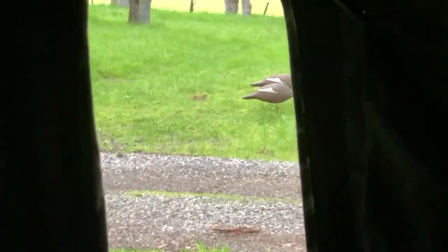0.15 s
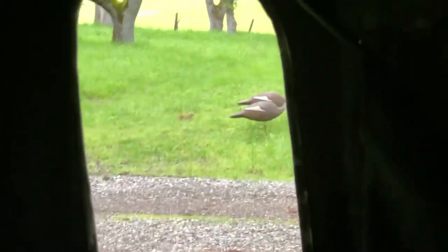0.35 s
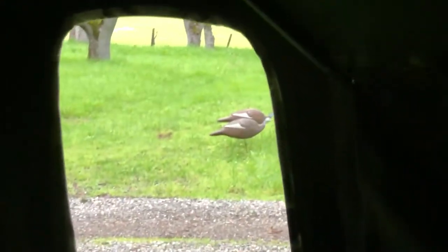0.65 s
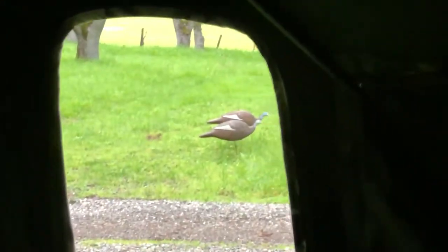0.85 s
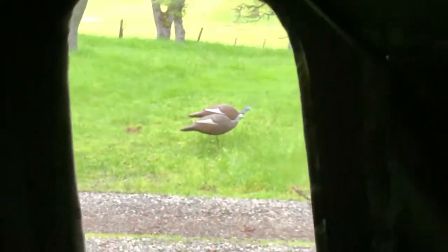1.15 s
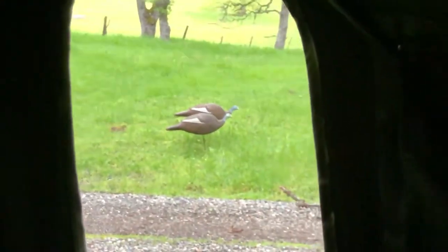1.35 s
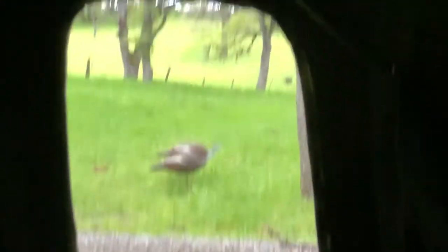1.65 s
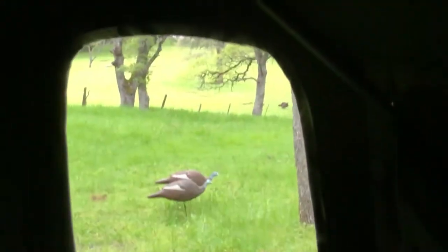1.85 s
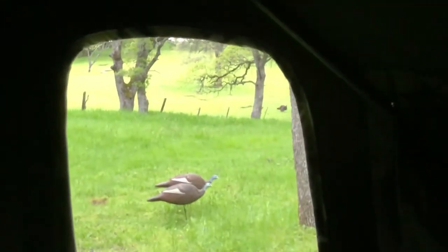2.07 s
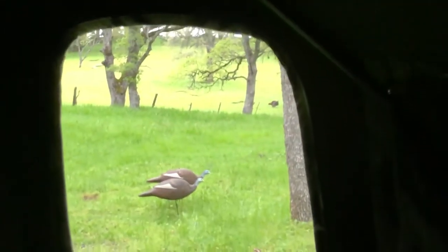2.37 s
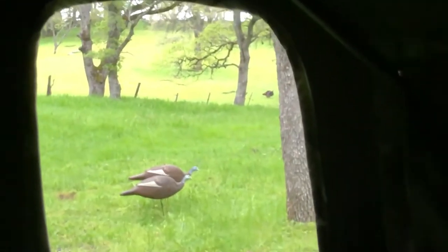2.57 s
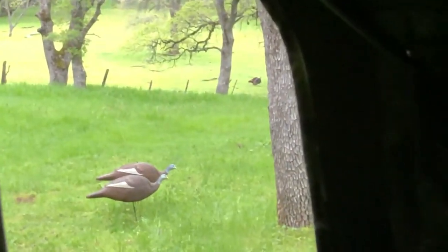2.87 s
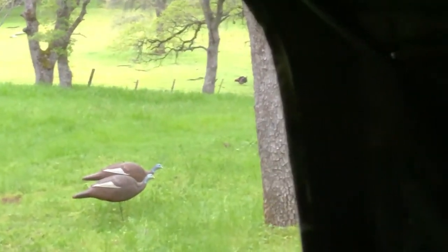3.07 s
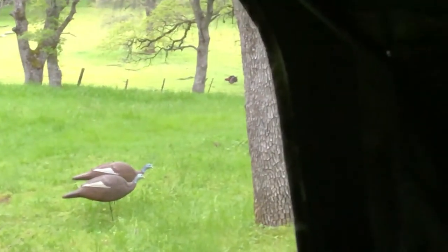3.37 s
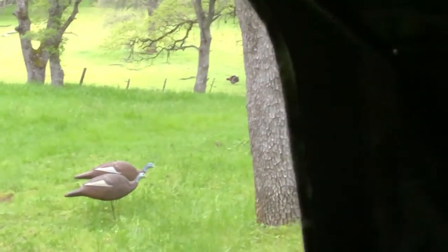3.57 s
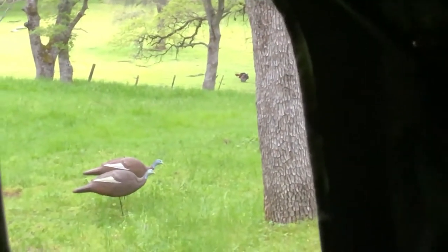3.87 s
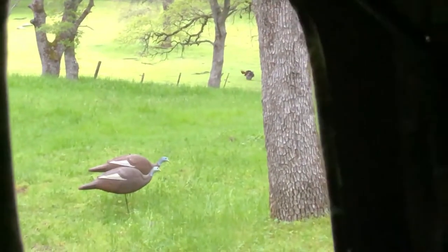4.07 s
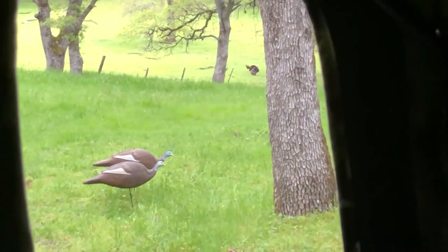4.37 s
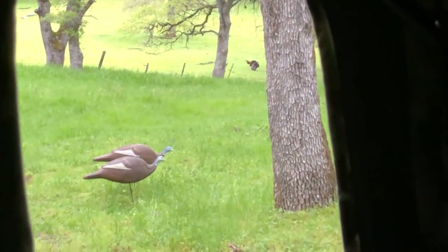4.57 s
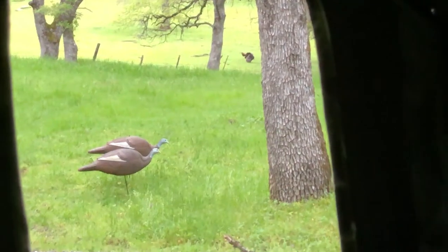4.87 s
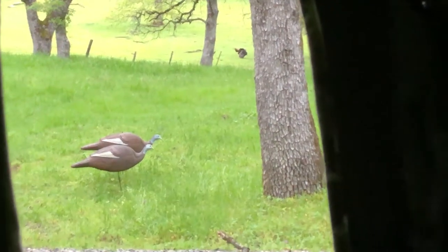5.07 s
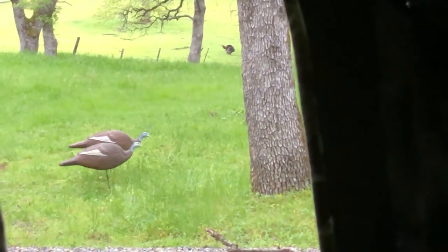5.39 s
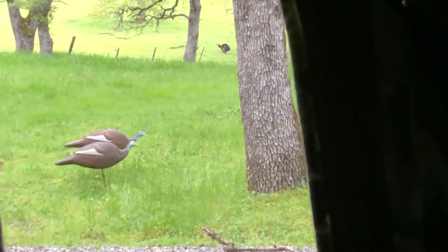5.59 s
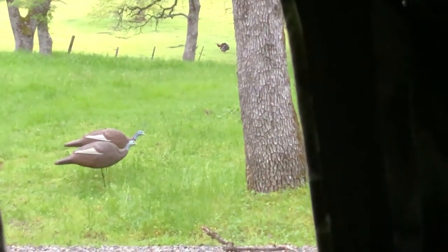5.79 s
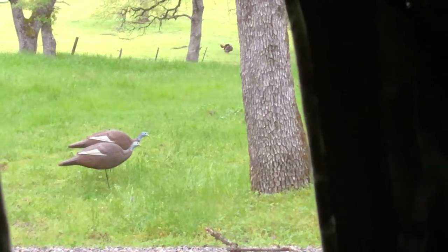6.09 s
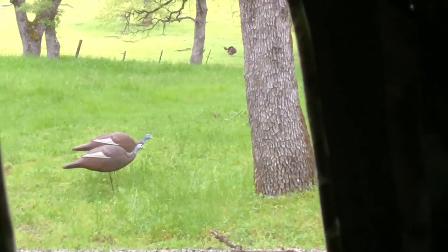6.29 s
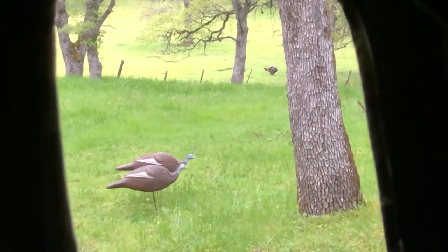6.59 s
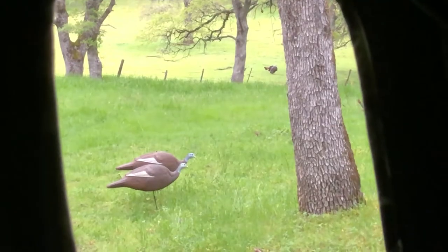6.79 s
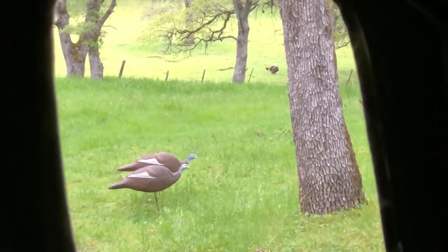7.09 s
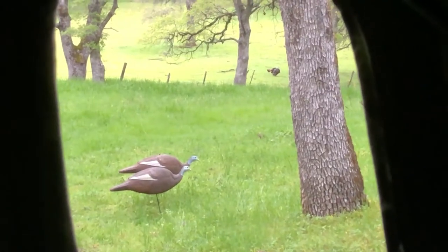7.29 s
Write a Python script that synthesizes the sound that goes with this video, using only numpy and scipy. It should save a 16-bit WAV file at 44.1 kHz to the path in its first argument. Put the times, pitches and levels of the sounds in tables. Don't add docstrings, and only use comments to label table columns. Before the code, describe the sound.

A bright songbird trill starts over deep unsteady rumble and gentle outdoor hiss. A hide taps, and a turkey lets out one abrupt, ringing cluck near the single microphone. Several short, dry putts follow, then scattered ones, two of them stronger around the middle. Small birds add buzzy falling notes, sliding whistles and fluttering warbles, near and far, across an open grassy meadow with light tree echo.

```python
import sys
import numpy as np
from scipy import signal
from scipy.fft import rfft, irfft
from scipy.io import wavfile
from scipy.ndimage import uniform_filter1d

SR = 44100
rng = np.random.default_rng(int(sys.argv[2]) if len(sys.argv) > 2 else 0)


def nominal_scale(level):
    x = np.asarray(level, float) / 20
    return 10 ** x


def wrap_up_sound(samples):
    columns = np.atleast_2d(samples).T
    tamed = np.clip(columns, -1, 1)
    steps = np.round(tamed * 32767).astype(np.int16)
    wavfile.write(sys.argv[1], SR, steps)


N = 328104
HZ = np.fft.rfftfreq(N, 1 / SR)
TIME_S = np.arange(N) / SR

# [f/Hz, width/Hz, level/dB]
RUMBLE_DRONES = [(47.6, 22.6, -10), (74.4, 19.8, -4), (90.4, 9.9, 0), (127.5, 28.8, -8)]
# [t/s, level/dB]
RUMBLE_SURGES = [(.06, -5), (.14, 1), (.24, 3.5), (.54, -4), (.82, 6), (1.12, 1.5), (1.2, -6), (1.43, 5),
                 (1.57, -4.5), (1.73, 3), (1.88, 2), (2.05, 8.5), (2.14, -5.5), (2.34, 5.5), (2.42, -3.5),
                 (2.48, 4), (2.77, 5), (3.9, 6.5), (4.27, 2.5), (4.64, -9), (4.72, 7.5), (4.9, 3.5),
                 (4.95, -3.5), (5.01, 1.5), (5.62, 6), (5.8, 3.5), (6.06, -3), (6.65, 3.5), (6.79, -6),
                 (7.07, 5)]
RUMBLE_DB, SURGE_S = -33, 0.031
# [f/Hz, density/dB per Hz]
AIR_SPECTRUM = [(82, -48), (140, -2), (400, -7.5), (801, -14.5), (3400, -26.5), (3920, -27), (8830, -30.5),
                (16000, -34.5)]
# [t/s, level/dB]
BREEZE_SWELL = [(0, 0), (.6, -.5), (1.35, 1.5), (1.72, 0.5), (2.0, -0.5), (2.3, -0.5), (3.4, -0.5),
                (4.0, 0), (4.4, -0.5), (5.08, -1), (5.45, -0.5), (5.93, -1), (6.4, -0.5), (6.8, -1),
                (7.1, -1.5), (7.44, 0)]
AIR_DB, BREEZE_TREBLE_SHARE = -41, 0.3

# [t/s, length/s, f/Hz, peak/dB]
PEEP_NOTES = [(0, 0.01, 4880, -35), (.485, 0.043, 3470, -54), (1.017, 0.016, 3930, -40.5),
              (1.16, 0.024, 4050, -51), (1.362, 0.029, 3890, -49), (1.525, 0.027, 3900, -50),
              (1.635, .025, 6110, -53), (1.86, .06, 4700, -58), (2.37, .14, 3640, -62),
              (2.976, .06, 4950, -59), (3.063, 0.11, 3730, -59), (3.31, 0.026, 4900, -54),
              (3.723, 0.027, 4920, -53), (3.843, .04, 4400, -61), (4.18, 0.022, 4950, -55),
              (4.67, .03, 3950, -51), (5.155, .08, 5900, -58), (5.294, 0.12, 3080, -55.5),
              (5.329, 0.025, 4500, -50), (5.577, .02, 4910, -52), (5.753, 0.023, 5350, -53),
              (5.89, .04, 6600, -57), (6.04, .025, 3970, -58), (6.072, 0.027, 3080, -55),
              (6.1, .08, 4900, -63), (6.19, .03, 4650, -58), (6.29, 0.049, 3760, -58),
              (7.254, 0.12, 3290, -59.5)]
# [t/s, level/dB, bottom f/Hz, end f/Hz, end level/dB re note]
TRILL_NOTES = [
    (.005, -36, 4300, 4980, 3.5),
    (0.075, -37.5, 4080, 4920, 3),
    (.147, -36, 4085, 4580, 0.5),
    (0.219, -34.5, 4100, 4780, -5),
    (0.292, -37.5, 3820, 4430, 3.5),
    (.368, -38, 4040, 4840, 1),
]
TRILL_TOP_HZ, DIVE_S, HOOK_S = 5900, 0.017, 0.0213
# [t/s, level/dB]
CHORUS_LEVEL = [(0.0, -55), (0.18, -54), (0.7, -53.5), (1.24, -53.5), (1.8, -56.5), (2.03, -62),
                (2.84, -60.5), (2.98, -54), (3.13, -62.5), (3.77, -55), (4.81, -57.5), (4.95, -61.5),
                (5.88, -54), (6.15, -53), (6.38, -64), (6.84, -67), (7.44, -64)]
# [t/s, peak/dB]
SEEP_NOTES = [(.42, -63), (.63, -63), (.84, -64), (1.57, -60), (2.43, -67), (2.57, -63), (3.4, -63),
              (3.63, -66), (4.14, -64), (4.43, -64), (4.82, -64), (5.59, -64), (6.43, -66), (6.58, -65),
              (6.89, -64)]
SEEP_HZ, SEEP_S = 8850, 0.06
# [t/s, length/s, start f/Hz, end f/Hz, peak/dB]
DIVE_NOTES = [(0.588, 0.059, 6240, 4600, -50), (.64, .04, 6160, 5800, -52), (0.697, .075, 6380, 4180, -49),
              (.825, .065, 6300, 4300, -45), (0.932, 0.088, 7600, 4500, -39.5),
              (1.083, .09, 7690, 3870, -45.5), (1.155, 0.024, 3900, 2900, -45.5),
              (1.293, .08, 6150, 3830, -49), (1.44, .095, 7400, 4050, -44.5),
              (1.516, .028, 4200, 3010, -46), (4.074, 0.021, 3540, 3030, -46),
              (4.795, 0.18, 3680, 3300, -49.5), (5.113, 0.032, 5970, 5360, -42),
              (5.867, 0.037, 6600, 5500, -45)]
# [t/s, length/s, start f/Hz, end f/Hz, peak/dB]
SLUR_NOTES = [(1.706, 0.11, 3230, 5020, -44), (1.777, .07, 5080, 4280, -46), (2.79, .018, 4250, 5050, -46),
              (2.804, 0.071, 5130, 4550, -48), (2.926, 0.03, 4800, 4900, -46),
              (2.973, .09, 4490, 3660, -45.5), (3.353, 0.073, 3840, 4550, -44),
              (3.588, 0.068, 4030, 4400, -41), (3.76, 0.076, 3960, 4404, -39.5),
              (4.645, 0.014, 3860, 5350, -44), (5.049, .085, 6430, 5900, -40.5),
              (5.73, 0.053, 3780, 4130, -45.5), (3.416, .015, 4800, 6600, -50),
              (3.99, 0.022, 2130, 2460, -45)]
SLUR_EASE = 1.2
# [t/s, length/s, centre f/Hz, peak/dB]
WARBLE_NOTES = [
    (4.003, 0.045, 4060, -44.5),
    (4.166, 0.053, 4080, -41),
    (4.334, 0.051, 3990, -44),
    (4.494, 0.075, 3730, -49.5),
    (4.616, 0.056, 3850, -48),
]
WARBLE_SWING_HZ, WARBLE_TURN_S = 230, 0.031
# (peak at share of length, start/dB re peak, end/dB re peak)
DIVE_SWELL, SLUR_SWELL = (0.57, -13.5, -9.5), (1, -12, -19)
WARBLE_SWELL, PEEP_SWELL = (0.59, -6, -12), (0.29, 2.5, -4.5)
DIVE_BUZZ, SLUR_BUZZ, WARBLE_BUZZ, PEEP_BUZZ = 0.75, 0.2, 0.3, 0.3
TREES_T60_S, TREES_GAP_S = 0.25, 0.00302

# [t/s,
# peak/dB, f/Hz, width/Hz]
TICK_EVENTS = [(0.228, -23, 300, 400), (0.551, -35, 2500, 600), (.556, -35, 3300, 1400),
               (.561, -34, 2500, 600), (.566, -38, 2400, 500), (.572, -39, 2600, 600),
               (1.1052, -28, 2300, 900), (1.106, -19, 5300, 2980), (1.3008, -36, 960, 400),
               (1.985, -31, 9000, 9000), (2.155, -34, 5000, 4000), (2.257, -28, 400, 500),
               (2.2572, -31, 3500, 3000), (2.26, -27, 140, 90), (2.331, -35, 1500, 1800),
               (2.333, -26, 140, 100), (5.079, -36, 380, 200), (5.097, -27.5, 570, 300),
               (5.098, -35, 1090, 400), (6.384, -36, 1300, 1000)]

# [t/s, level/dB]
VOICE_POPS = [
    (0.5468, -18.5),
    (0.55, -27),
    (0.5533, -23),
    (.5582, -13),
    (0.567, -27),
    (0.572, -31),
    (.581, -36),
    (0.59, -35),
]
# [f/Hz, level/dB, t60/s]
THROAT_RINGS = [(1270, -32, .09), (1360, 2, 0.062), (1405, -1, 0.08), (1480, 1.5, 0.076), (1665, -8, .09),
                (1800, -12, 0.12), (1870, -1.5, 0.081)]
CLUCK_SHUT_S = 0.598
# [f/Hz, width/Hz, level/dB]
LEAF_PEAKS = [(1830, 220, 2), (1500, 200, -8)]

# [t/s, level/dB (throat rms 10 dB lower), length/s, chest level/dB, brightness/dB]
PUTT_EVENTS = [(1.299, -28.5, 0.018, 4, -6), (1.38, -29.5, 0.027, -1, -4), (1.453, -32, 0.019, 6, -1),
               (1.54, -32.5, 0.018, 7, -2), (1.659, -33.5, 0.02, 3, -7), (2.472, -38, 0.012, -3, 2),
               (2.879, -24, 0.027, -4, -4.5), (3.89, -25.5, 0.022, 0, -4.5), (4.134, -32, 0.026, 2, -4),
               (4.718, -27.5, 0.02, 0, -5.5), (7.332, -40, 0.02, 7, 5)]
# [f/Hz, width/Hz, level/dB]
THROAT_PEAKS = [(1064, 81, 1.5), (1640, 400, -10.5), (2280, 170, -7), (2620, 800, -12.5),
                (3440, 750, -13.5), (5240, 2200, -22)]
# [f/Hz, width/Hz, level/dB]
CHEST_PEAKS = [(477, 48, -1.5), (700, 37, -4)]

TOP_HZ = 15780


def level(x, db):
    return x * nominal_scale(db) / np.sqrt(np.mean(x ** 2))


def resonate(x, peaks):
    f = np.fft.rfftfreq(len(x), 1 / SR) + 1e-3
    response = 0
    for k, (hz, width_hz, db) in enumerate(peaks):
        detune = f / width_hz - hz * hz / (f * width_hz)
        response = response + (-1) ** k * nominal_scale(db) / (1 + 1j * detune)
    return irfft(rfft(x) * response, len(x))


def add(out, s, x):
    i = int(s * SR)
    out[i:i + len(x)] += x[:N - i]


def rumble():
    drone = resonate(rng.standard_normal(N), RUMBLE_DRONES)
    drone = resonate(drone, [(82.4, 95, 0)])
    drone /= np.sqrt(uniform_filter1d(drone ** 2, int(0.09 * SR)))
    surge_db = sum(db * np.exp(-((TIME_S - s) / SURGE_S) ** 2) for s, db in RUMBLE_SURGES)
    return drone * nominal_scale(RUMBLE_DB + surge_db)


def walk(rate_hz):
    k = int(SR / rate_hz)
    steps = np.repeat(rng.standard_normal(N // k + 1), k)
    return 1.3 * uniform_filter1d(uniform_filter1d(steps, k), k)[:N]


def air():
    hz, db = np.transpose(AIR_SPECTRUM)
    spectrum = rfft(rng.standard_normal(N)) * nominal_scale(np.interp(np.log(HZ + 1), np.log(hz), db))
    swell_db = np.interp(TIME_S, *np.transpose(BREEZE_SWELL))
    hiss = 0
    for centre_hz in 125 * 2.0 ** np.arange(8):
        octaves = np.clip(np.log2((HZ + 1) / centre_hz), -1, 1)
        band = irfft(spectrum * np.cos(np.pi / 2 * octaves) ** 2, N)
        share = min(350 / centre_hz, 1)
        breeze_db = (share + (2.5 - share) * BREEZE_TREBLE_SHARE) * swell_db
        flicker_db = (1.07 + 0.56 * share) * walk(11)
        hiss = hiss + band * nominal_scale(breeze_db + flicker_db)
    whine = resonate(rng.standard_normal(N), [(15450, 250, 0)]) * nominal_scale(3 * walk(2.44))
    return level(hiss, AIR_DB) + level(whine, -70)


def trees(x, wet_db, t60_s):
    t = np.arange(SR) / SR
    tail = rng.standard_normal(SR) * 1000.0 ** (-t / t60_s) * (t > TREES_GAP_S)
    tail /= np.sqrt(np.sum(tail ** 2))
    return x + nominal_scale(wet_db) * signal.fftconvolve(x, tail)[:N]


def whistle(out, rows, buzz=1.0, buzz_hz=333.3, edge_s=0.003):
    s, hz, db = np.transpose(rows)
    t = np.arange(s[0], s[-1], 1 / SR)
    fade = np.clip(np.minimum(t - s[0], s[-1] - t) / edge_s, 0, 1)
    a, b = rng.standard_normal((2, 600))
    place = (t - s[0]) * 2 * buzz_hz * (0.5 + buzz)
    index = np.arange(600)
    smear = np.interp(place, index, a) + 1j * np.interp(place, index, b)
    carrier = np.exp(2j * np.pi * np.cumsum(np.interp(t, s, hz)) / SR)
    tone = carrier * (np.sqrt(1 - buzz) + np.sqrt(0.89 * buzz) * smear)
    add(out, s[0], np.sqrt(2) * nominal_scale(np.interp(t, s, db)) * fade * tone.real)


def note(out, s, length_s, pitch_hz, db, swell, buzz):
    share = np.linspace(0, 1, num=33)
    hz = np.interp(share, np.linspace(0, 1, num=len(pitch_hz)), pitch_hz)
    peak_at, start_db, end_db = swell
    shape_db = np.interp(share, [0, np.clip(peak_at, 0.05, 0.95), 1], [start_db, 0, end_db])
    whistle(out, np.transpose([s + length_s * share, hz, db + shape_db]), buzz)


def peeps(out):
    for s, length_s, hz, db in PEEP_NOTES:
        note(out, s, length_s, [hz, hz], db, PEEP_SWELL, PEEP_BUZZ)
    for s, db in SEEP_NOTES:
        note(out, s, SEEP_S, [SEEP_HZ, SEEP_HZ], db, PEEP_SWELL, PEEP_BUZZ)


def trill(out):
    for s, db, low_hz, end_hz, end_db in TRILL_NOTES:
        turn = s + DIVE_S
        rows = [(s, TRILL_TOP_HZ, db - 15),
                (s + 0.5 * DIVE_S, 1.17 * low_hz, db),
                (s + 0.776 * DIVE_S, 1.03 * low_hz, db + 0.5),
                (turn, low_hz, db),
                (turn + 0.294 * HOOK_S, 1.04 * low_hz, db),
                (turn + 0.7 * HOOK_S, end_hz, db + end_db),
                (turn + HOOK_S, 0.98 * end_hz, db + end_db - 3)]
        whistle(out, rows, buzz=0.2)


def chorus():
    far = np.zeros(N)
    for when, pitch, glide in rng.random((900, 3)):
        s, hz = 7.3 * when, 3500 + 2300 * pitch
        whistle(far, [(s, hz, 0), (s + 0.04, hz * (0.8 + 0.4 * glide), 0)])
    s, db = np.transpose(CHORUS_LEVEL)
    return level(trees(far, 10.5, 0.44), 0) * nominal_scale(np.interp(TIME_S, s, db))


def dives(out):
    for s, length_s, start_hz, end_hz, db in DIVE_NOTES:
        note(out, s, length_s, [start_hz, end_hz], db, DIVE_SWELL, DIVE_BUZZ)


def slurs(out):
    glide = (1 - np.linspace(0, 1, num=33)) ** SLUR_EASE
    for s, length_s, start_hz, end_hz, db in SLUR_NOTES:
        note(out, s, length_s, end_hz + (start_hz - end_hz) * glide, db, SLUR_SWELL, SLUR_BUZZ)


def warbles(out):
    for s, length_s, hz, db in WARBLE_NOTES:
        turns = np.linspace(-0.25, length_s / WARBLE_TURN_S - 0.25, num=33)
        swing_hz = WARBLE_SWING_HZ * np.cos(2 * np.pi * turns)
        note(out, s, length_s, hz + swing_hz, db, WARBLE_SWELL, WARBLE_BUZZ)


def birds():
    near = np.zeros(N)
    for sing in (peeps, trill, dives, slurs, warbles):
        sing(near)
    return trees(near, -5, TREES_T60_S) + chorus()


def ticks():
    out = np.zeros(N)
    impulse = np.arange(2048) == 0
    for s, db, hz, width_hz in TICK_EVENTS:
        peak = [(hz, width_hz, 0)]
        click = resonate(resonate(impulse, peak), peak)
        add(out, s, click * nominal_scale(db) / np.abs(click).max())
    return out


def cluck():
    pops = np.zeros(N)
    for s, db in VOICE_POPS:
        add(pops, s, nominal_scale(db) * np.ones(1))
    t = np.arange(SR // 4) / SR
    rings = 0
    for hz, db, t60_s in THROAT_RINGS:
        decay = 1000.0 ** (-t / (0.71 * t60_s))
        rings = rings + nominal_scale(db) * np.sin(2 * np.pi * hz * t) * decay
    onset = 1 - np.exp(-t / 0.0019)
    voice = signal.fftconvolve(pops, rings * onset)[:N]
    voice *= np.clip((CLUCK_SHUT_S - TIME_S) / 0.0044, 0, 1)
    beak = [(1490, 830, 0)]
    voice = resonate(resonate(voice, beak), beak)
    echo = trees(voice, -10.5, 0.67) - voice
    return voice + resonate(echo, LEAF_PEAKS)


def putts():
    out, t = np.zeros(N), np.arange(4096) / SR
    for s, db, length_s, chest_db, bright_db in PUTT_EVENTS:
        chance = rng.random((2, len(t)))
        clicks = (chance[0] < 4000 / SR) * (2 * chance[1] - 1)
        clicks[0] = 2.0
        spray = clicks * np.clip((length_s - t) / (0.54 * length_s), 0, 1)
        throat = resonate(spray, THROAT_PEAKS[:2])
        throat = throat + nominal_scale(bright_db) * resonate(spray, THROAT_PEAKS[2:])
        chest = nominal_scale(chest_db) * resonate(spray, CHEST_PEAKS)
        throat_rms = np.sqrt(np.sum(throat ** 2) / (length_s * SR))
        add(out, s, (throat + chest) * nominal_scale(db - 10) / throat_rms)
    return trees(out, -8, 0.073)


def scene():
    return (rumble() + air() + birds() + ticks() + cluck() + putts())[None]


def roll_off(x):
    return signal.sosfilt(signal.butter(12, 17060, fs=SR, output="sos"), x)


def record(dry):
    mix = irfft(rfft(dry) * (HZ < TOP_HZ), N)
    return roll_off(mix)


dry = scene()
out = record(dry)
wrap_up_sound(out)
```